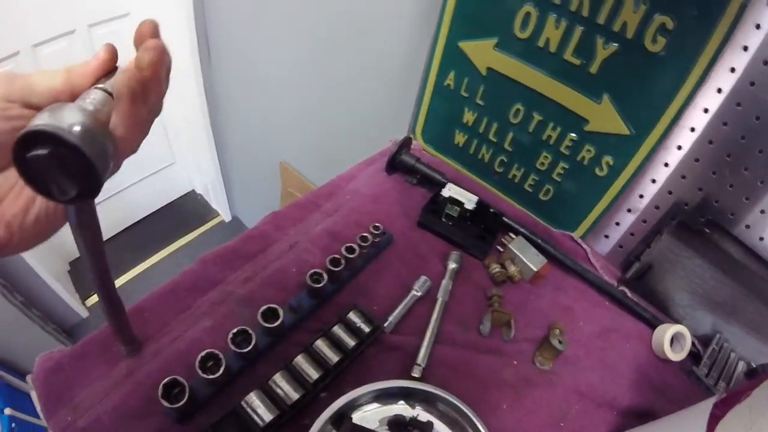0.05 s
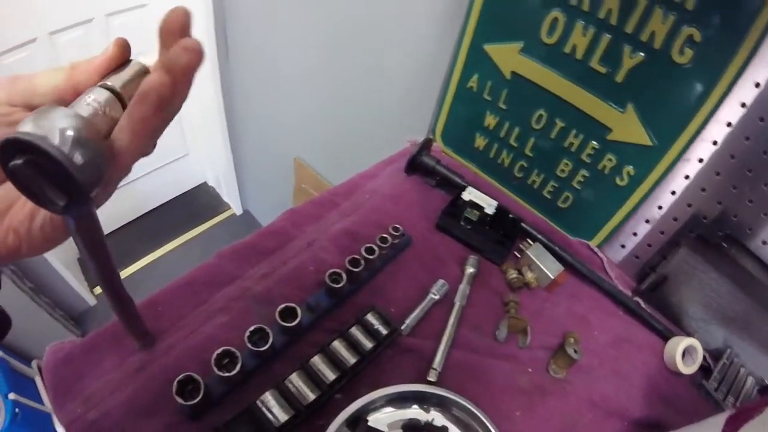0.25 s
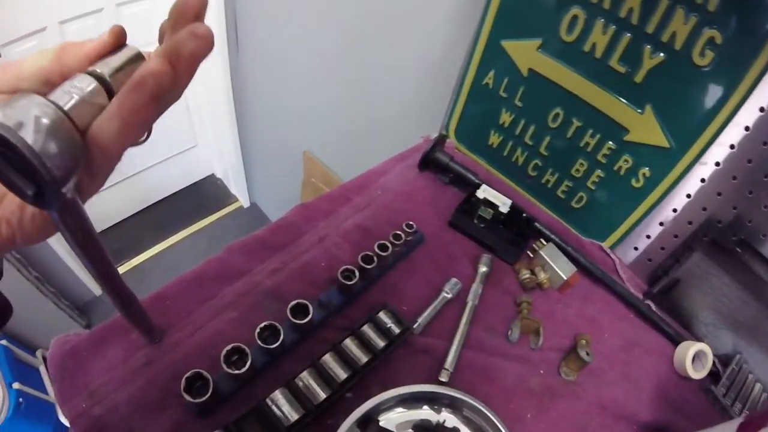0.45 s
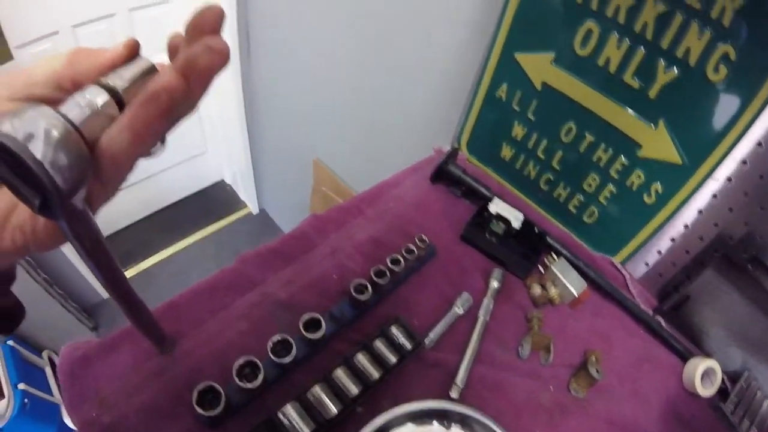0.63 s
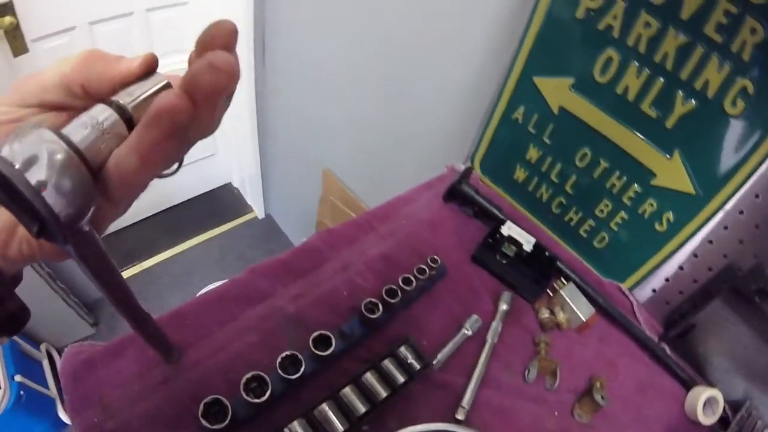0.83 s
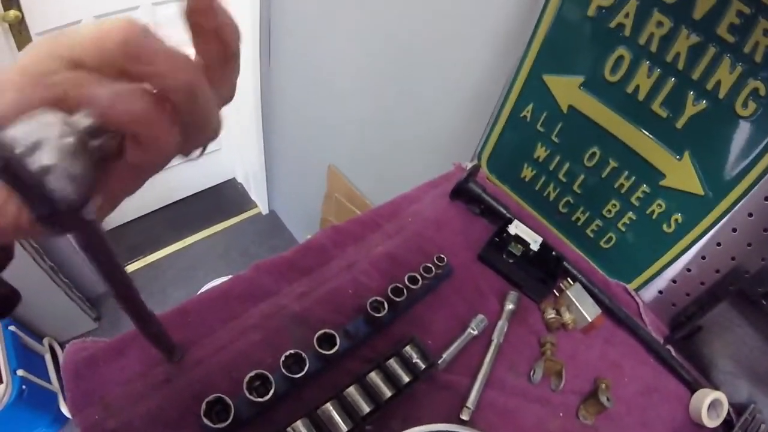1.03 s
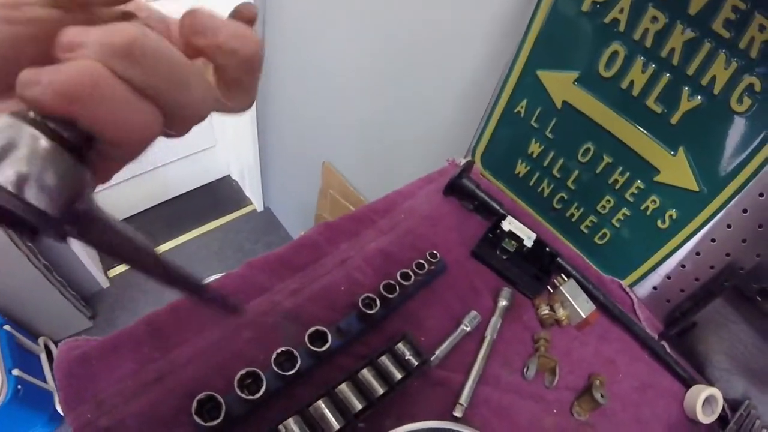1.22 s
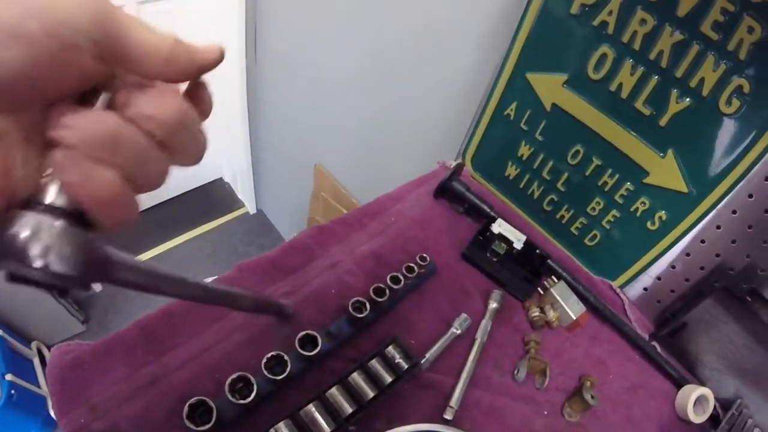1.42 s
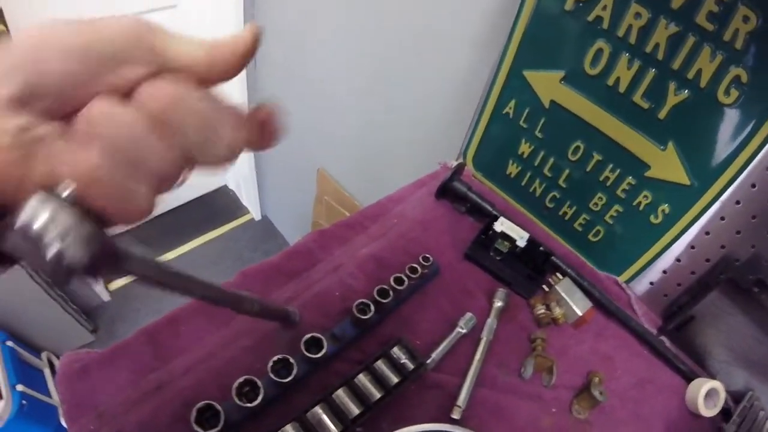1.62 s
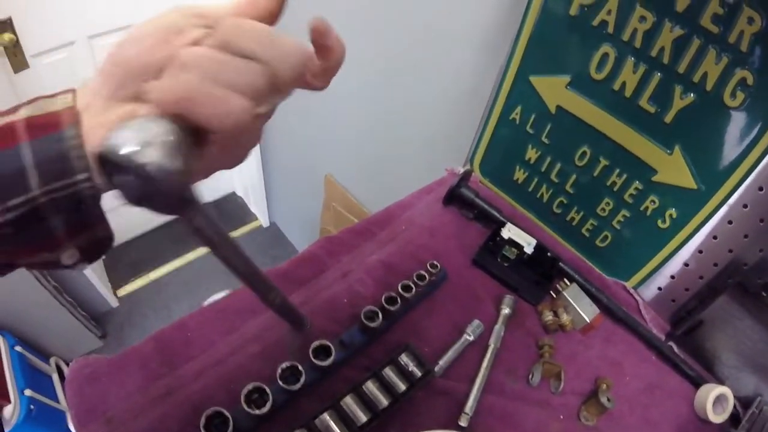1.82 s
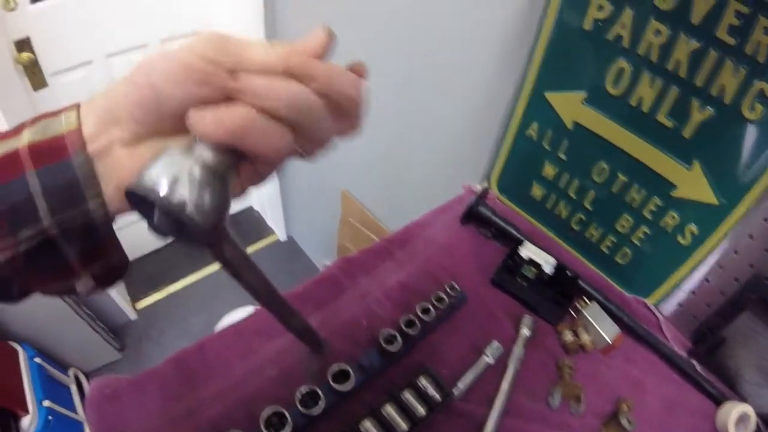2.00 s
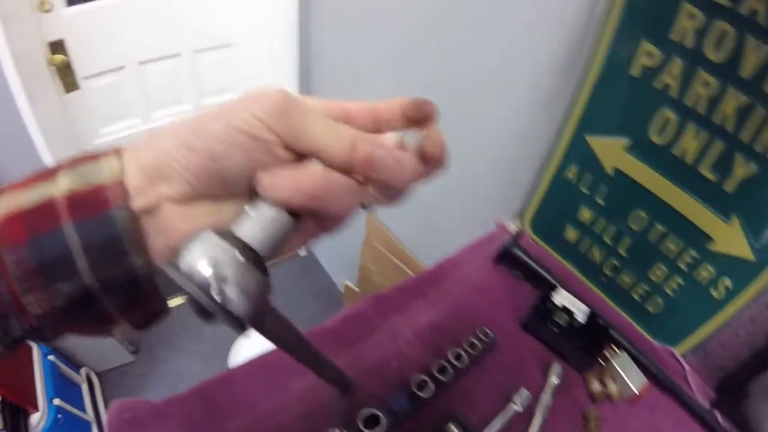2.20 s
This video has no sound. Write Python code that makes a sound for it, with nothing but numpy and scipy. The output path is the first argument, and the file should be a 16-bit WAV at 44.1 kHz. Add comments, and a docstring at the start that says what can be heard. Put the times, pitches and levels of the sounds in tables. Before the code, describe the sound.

Close up in a small workshop, a socket ratchet clicks tooth by tooth, then pauses. The handle lands on a cloth-covered bench with a dull thump, followed by a fast run of crisp clicks and two faint taps.

```python
"""A socket ratchet is turned by hand over a cloth-covered bench in a small, faintly rumbling workshop.
First the pawl drops over five teeth one by one; each impact cracks and briefly rings the steel head
and socket. A finger taps the tool, then the handle thumps on the padded bench and excites its low modes.
A quick twist runs off nine more teeth, each with a hollow knock, and two light taps come last."""
import sys
import numpy as np
from scipy import signal
from scipy.fft import rfft, irfft
from scipy.io import wavfile

SR = 44100
rng = np.random.default_rng(int(sys.argv[2]) if len(sys.argv) > 2 else 0)


def dump(signal):
    """Clip the signal to [-1, 1] and save it as 16-bit WAV at the path in sys.argv[1]."""
    limited = np.clip(np.atleast_2d(signal).T, -1, 1)
    pcm = np.round(limited * 32767).astype(np.int16)
    wavfile.write(sys.argv[1], SR, pcm)


N = 99269
LEAD = 4410   # samples before time zero
T = np.arange(SR // 2) / SR   # time within one event, s

# pawl drops: start_s, crack_db, ring_db, socket_extra_db, handle_extra_db, shimmer_extra_db
PAWL_DROPS = [(-.018, -36, -28, -19, -8, -10), (.1180, -37, -32, 0.5, -7, -7),
              (0.249, -38.5, -30, -7, -9.5, -8), (0.362, -38, -32.5, -15.5, 4, -4),
              (0.4981, -36.5, -32, -2, -0.5, -7), (0.7293, -38, -33, -13, 2, -4),
              (1.5438, -36, -34, 8, 0, 3.5), (1.6, -35.5, -30, 6.5, -0.5, -0.5),
              (1.6351, -35.5, -38, 11, 8, 11), (1.654, -37, -35, -5, 10, 4),
              (1.6721, -38, -36.5, 3.5, 5.5, 9), (1.692, -34, -36.5, -22, -14, 10.5),
              (1.71, -38.5, -39, 6, 0, 12), (1.7283, -36.5, -37.5, -3.5, 5.5, 11),
              (1.7764, -36.5, -39, -12, 2, 9.5)]
# modes of the tool and the bench: pitch_hz, level_db, t60_s
STEEL_MODES = [(5078, -4, 0.029), (5150, -5.5, 0.087), (5397, -6.5, 0.028), (7720, -4.5, 0.05),
               (8060, -14.5, 0.046), (11440, -13.5, 0.027), (11350, -16, 0.065), (11240, -16, .05)]   # head and socket
SOCKET_MAIN_MODE = [(7985, 4, 0.029)]
HANDLE_MODES = [(917, -27.5, .07), (2052, -18.5, 0.02), (2247, -20, .022), (2807, -10, 0.054),
                (2963, -6, 0.021)]
SHIMMER_MODES = [(11140, -8.5, .06), (14600, -14.5, 0.11), (14400, -18.5, 0.065), (14780, -20.5, 0.039)]   # highest modes of the steel
BENCH_MODES = [(95.8, -31.5, 0.12), (151.3, -28.5, 0.12), (167.5, -17, 0.1), (198, -16, 0.16),
               (228.7, -28.5, 0.28), (270.6, -22.5, 0.065), (309, -26, 0.15), (331.4, -21.5, 0.07),
               (375, -19, 0.057), (426, -27, 0.12), (491, -30, 0.33), (571, -59, .14), (604, -35.5, 0.24),
               (752, -20, 0.16), (950, -17, .1)]
# the handle lands and settles: start_s, level_db, contact_s
HANDLE_LANDINGS = [(1.3855, 0, 0.0022), (1.4110, -21, 0.0051), (1.4560, -34, 0.0013)]
# taps of fingers and loose steel: start_s, level_db, pitch_hz, ring_relative_db
LIGHT_TAPS = [(1.094, -65, 2970, 8), (1.198, -64, 5200, -11), (1.386, -39, 2868, -9),
              (1.431, -49, 2920, -12), (1.481, -53, 5280, -6.5), (1.938, -63, 5230, -10),
              (2.064, -55, 896, 2)]
# noise spectra of the contacts and the room: frequency_hz, density_db
CRACK_SPECTRUM = [(200, -10), (600, -4.5), (950, 3), (1400, -5.5), (2150, 2.5), (3800, -4), (5200, 2.5),
                  (6300, -2), (8000, 7.5), (9500, -1.5), (11300, 2.5), (13200, -9), (14500, -20),
                  (15500, -11.5)]
KNOCK_SPECTRUM = [(50, -4.5), (110, -3.5), (190, 0.5), (300, -10), (480, -11), (650, -28), (830, -13.5),
                  (920, -6), (1050, -21), (1400, -51), (4000, -38.5)]
TAP_SPECTRUM = [(300, -1), (850, 9.5), (1500, -9.5), (2800, 2), (4000, -6.5), (6000, -5), (10000, -14.5),
                (15000, -37.5)]
RUMBLE_SPECTRUM = [(12, -11), (20, 2.5), (37, -3.5), (86, -13.5), (113, -14), (248, -21), (472, -27),
                   (873, -28), (1220, -35), (2990, -42.5), (4670, -45.5), (9670, -55), (16000, -66.5)]
# reverberation time: frequency_hz, t60_s
ROOM_DECAY = [(100, 0.45), (500, 0.36), (3000, 0.21), (8000, 0.24), (15000, 0.1)]


def pawl():
    """Impact excitation: each drop cracks and rings the steel's modes, differently as the grip shifts."""
    rise_s, hold_s = 0.0015, 0.0022
    detune, spread_db = 0.0032, 0.2
    attack = 1 - np.exp(-(T / rise_s) ** 2)
    out = np.zeros(LEAD + N)
    for start_s, crack_db, ring_db, socket_db, handle_db, shimmer_db in PAWL_DROPS:
        parts = [(STEEL_MODES, 0), (SOCKET_MAIN_MODE, socket_db),
                 (HANDLE_MODES, handle_db), (SHIMMER_MODES, shimmer_db)]
        ring = 0
        for modes, part_db in parts:
            for pitch_hz, mode_db, t60_s in modes:
                gain = from_db(ring_db + part_db + mode_db - spread_db * rng.normal())
                detuned_hz = pitch_hz * (1 + detune * rng.normal())
                tone = np.sin(2 * np.pi * (detuned_hz * T + rng.random()))
                ring += gain * decay(t60_s, hold_s) * tone
        crack = from_db(crack_db) * burst(CRACK_SPECTRUM, hold_s=0.0025, t60_s=0.035)
        add(out, start_s, attack * ring + crack)
    return out


def knocks():
    """Impulse transmission: each tooth jolts the whole tool, hardest where the twist is fastest."""
    fast_start_s, fast_end_s, fade_s = 1.724, 1.74, 0.26
    out = np.zeros(LEAD + N)
    for start_s, *_ in PAWL_DROPS:
        away_s = max(fast_start_s - start_s, start_s - fast_end_s, 0)
        gain = from_db(-43.5) * np.exp(-away_s / fade_s)
        add(out, start_s, gain * burst(KNOCK_SPECTRUM, hold_s=0.012, t60_s=0.14))
    return out


def bench():
    """Modal response: the handle's cushioned force pulses drive the bench; longer contact is duller."""
    force = np.zeros(LEAD + N)
    for start_s, level_db, contact_s in HANDLE_LANDINGS:
        pulse = np.sin(np.pi * np.minimum(T / contact_s, 1)) ** 2
        add(force, start_s, from_db(level_db) * pulse / pulse.sum())
    response = sum(from_db(level_db) * decay(t60_s) * np.cos(2 * np.pi * pitch_hz * T)
                   for pitch_hz, level_db, t60_s in BENCH_MODES)
    return signal.fftconvolve(force, response)[:LEAD + N]


def taps():
    """Damped free vibration: dull contacts of fingers and loose socket each leave one mode ringing."""
    out = np.zeros(LEAD + N)
    for start_s, level_db, pitch_hz, ring_db in LIGHT_TAPS:
        contact = burst(TAP_SPECTRUM, hold_s=0.0025, t60_s=0.04)
        ring = from_db(ring_db) * decay(t60_s=0.072) * np.sin(2 * np.pi * pitch_hz * T)
        add(out, start_s, from_db(level_db) * (contact + ring))
    return out


def reverberation(source, delay_s=0.0024):
    """Diffuse reflection: the workshop's echo dies away at its own rate in each frequency band."""
    white = rfft(rng.standard_normal(len(T)))
    hz = np.arange(len(white)) * SR / len(T)
    edges_hz = np.geomspace(40, 20000, 13)
    tail = 0
    for low, high in zip(edges_hz, edges_hz[1:]):
        band = irfft(white * (hz >= low) * (hz < high), len(T))
        tail += band * decay(at_hz(ROOM_DECAY, np.sqrt(low * high)))
    tail *= T > delay_s
    tail /= np.sqrt(np.sum(tail ** 2))
    return signal.fftconvolve(source, tail)[:len(source)]


def rumble():
    """Stationary noise: the room's faint background has most of its power at low frequencies."""
    return from_db(-50.5) * noise(RUMBLE_SPECTRUM, N)


def burst(spectrum, hold_s, t60_s):
    """Transient noise: a contact's dense chatter starts at once, holds briefly, then dies."""
    return noise(spectrum, len(T)) * decay(t60_s, hold_s)


def noise(spectrum, size):
    """Spectral shaping: white noise takes on the given colour, at rms 1."""
    hz = np.arange(size // 2 + 1) * SR / size
    white = rfft(rng.standard_normal(size))
    coloured = irfft(white * from_db(at_hz(spectrum, hz)), size)
    return coloured / coloured.std()


def decay(t60_s, hold_s=0):
    """Exponential damping: after the hold, the amplitude falls 60 dB every t60_s."""
    return np.exp(-np.log(1000) * np.maximum(T - hold_s, 0) / t60_s)


def at_hz(table, hz):
    """Interpolation on a log-frequency axis."""
    table_hz, values = np.transpose(table)
    return np.interp(np.log(np.maximum(hz, 1)), np.log(table_hz), values)


def from_db(db):
    """Amplitude ratio of a level in decibels."""
    return 10 ** (np.asarray(db) / 20)


def add(out, start_s, sound):
    """Superposition: a sound joins the track at start_s, counted from the end of the lead-in."""
    i = max(int(start_s * SR) + LEAD, 0)
    out[i:i + len(sound)] += sound[:max(len(out) - i, 0)]


def scene():
    """Direct and reverberant fields: the nearby tool and bench sum with their echoes and the rumble."""
    tool = pawl() + knocks() + taps()
    thumps = bench()
    echo = from_db(-10) * reverberation(tool) + from_db(-9) * reverberation(thumps)
    return ((tool + thumps + echo)[LEAD:] + rumble())[None]


def record(dry):
    """Band limiting: the microphone sheds the deepest rumble, and the top is cut steeply."""
    low_hz, high_hz = 6, 15700
    highpass = signal.butter(1, low_hz, "high", fs=SR, output="sos")
    lowpass = signal.ellip(10, 0.2, 80, high_hz, fs=SR, output="sos")
    return signal.sosfilt(lowpass, signal.sosfilt(highpass, dry))


dry = scene()
out = record(dry)
dump(out)
```